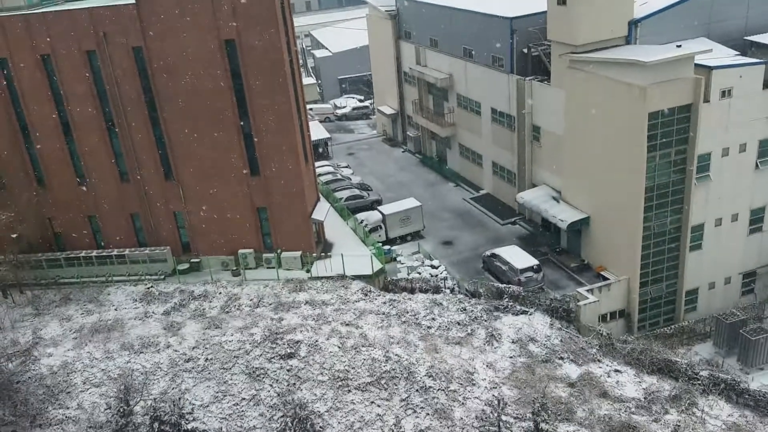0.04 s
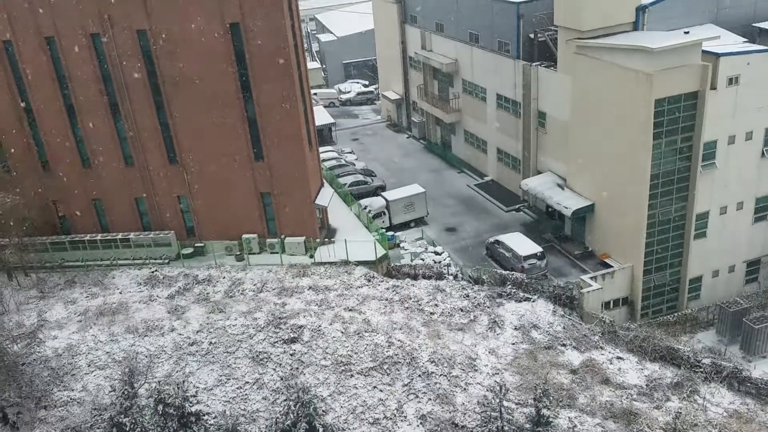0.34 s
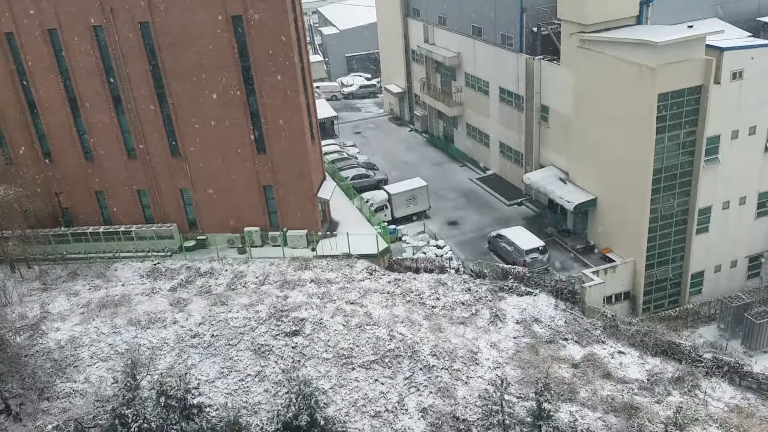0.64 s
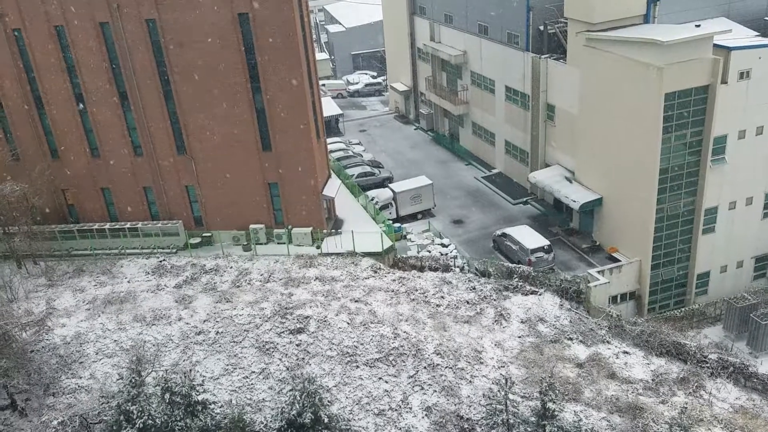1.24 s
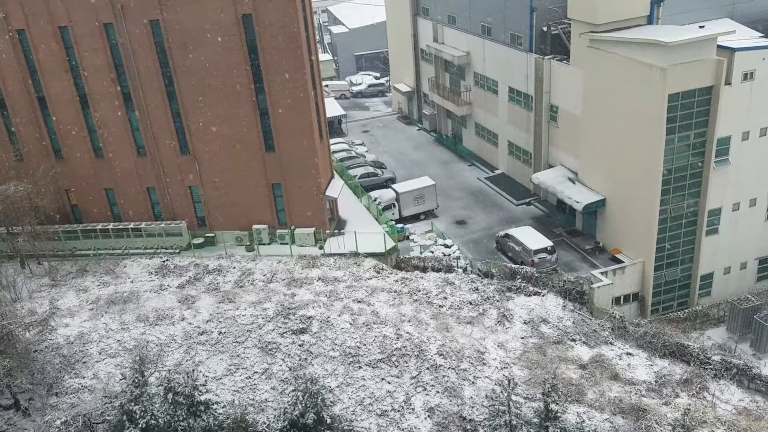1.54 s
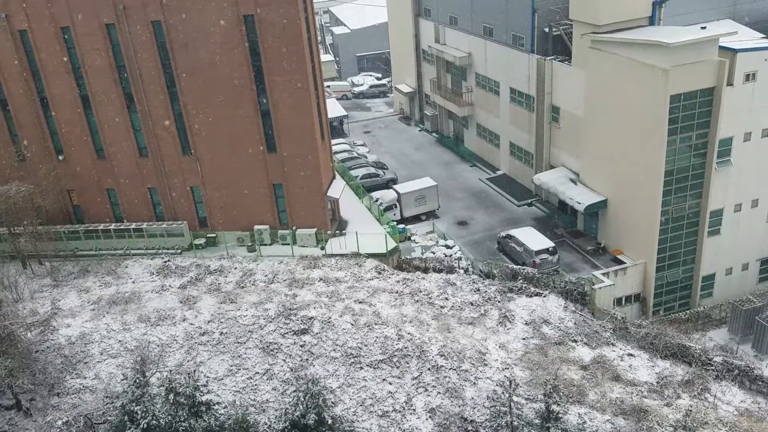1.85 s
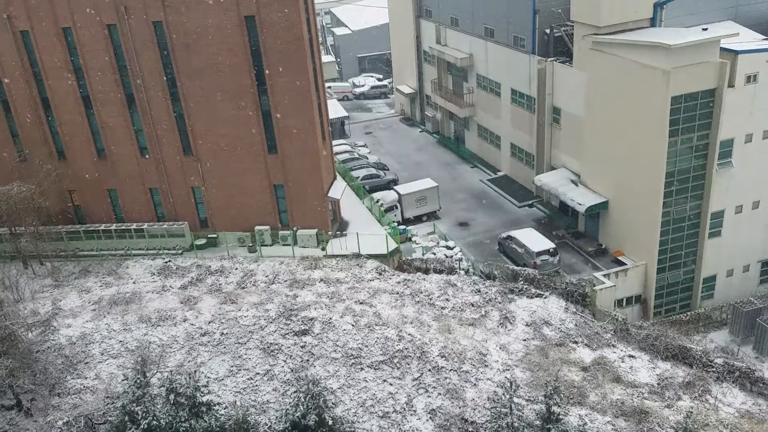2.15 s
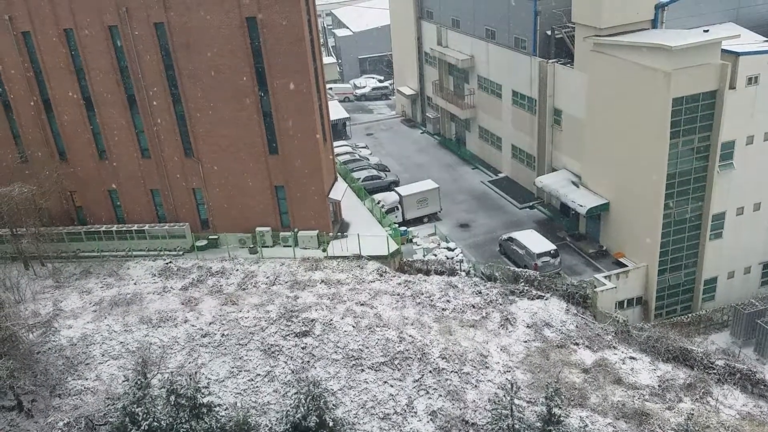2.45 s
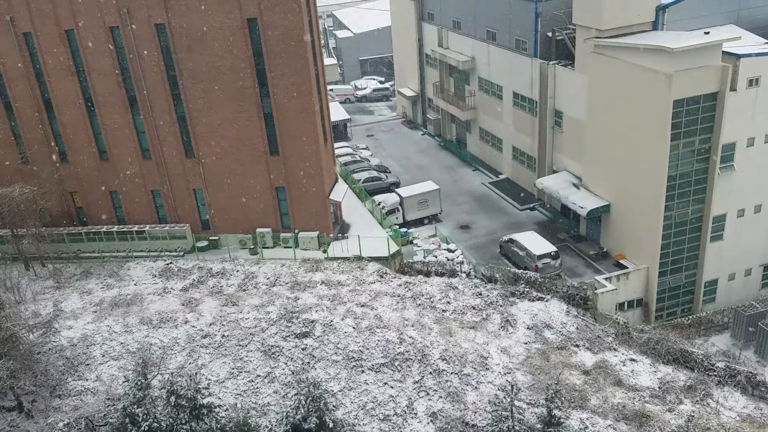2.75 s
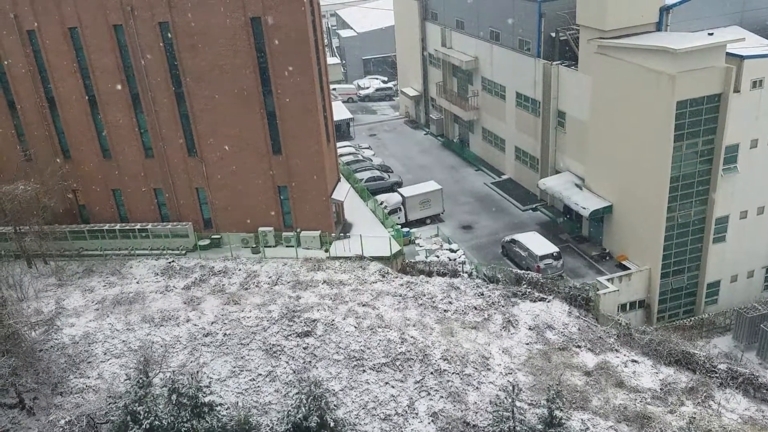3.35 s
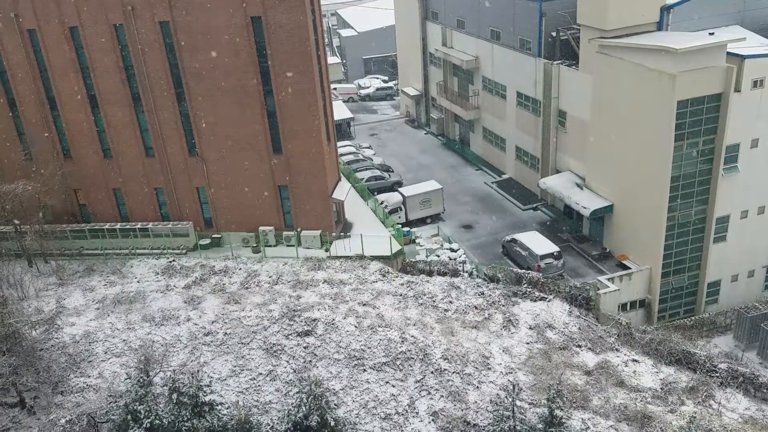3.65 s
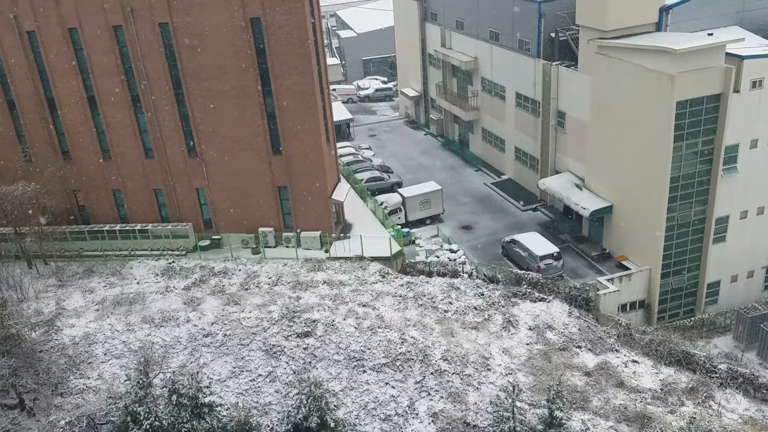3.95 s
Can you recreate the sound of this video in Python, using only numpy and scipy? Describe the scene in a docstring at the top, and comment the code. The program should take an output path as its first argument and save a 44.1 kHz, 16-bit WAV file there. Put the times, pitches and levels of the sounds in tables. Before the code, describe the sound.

A soft, even wash of far traffic carries between town buildings, with faint ventilation whines. Later a low rumble rises along with a pulsing fan hum, while a hand faintly ticks and rubs on the microphone.

```python
"""Far traffic, a steady hush echoed by the walls, heard from high up between the buildings of a snowy town.
Ventilation machinery adds faint whines and a hum that throbs as two fans beat against each other.
Past the middle a low rumble and the hum swell together. Close to the microphone a hand ticks and
rubs faintly on the casing, over the microphone's own hiss."""
import sys
import numpy as np
from scipy import signal
from scipy.fft import rfft, irfft
from scipy.io import wavfile
from scipy.ndimage import uniform_filter1d

SR = 44100
rng = np.random.default_rng(int(sys.argv[2]) if len(sys.argv) > 2 else 0)


def file_out(sig):
    """Save sig as 16-bit WAV at sys.argv[1]."""
    # one column per channel
    cols = np.atleast_2d(sig).T
    # limit, then scale
    lim = np.clip(cols, -1, 1)
    pcm = np.round(lim * 32767).astype(np.int16)
    wavfile.write(sys.argv[1], SR, pcm)


N = 176400

# spectrum of the hush common to both ears: f/Hz, relative density/dB
HUSH_MID_SPECTRUM = [(13, -61), (22, -29), (45, -13.5), (70, -8.5), (97, -9.5), (130, -7.5), (160, -7),
                     (190, -9), (215, -8), (285, -10), (308, -13.5), (342, -7.5), (385, -9.5), (422, -7),
                     (465, -14), (520, -12), (710, -15.5), (825, -19.5), (1150, -16.5), (1430, -26),
                     (1940, -22), (2430, -26.5), (2800, -29.5), (3210, -34), (4400, -38.5), (6000, -46),
                     (9000, -54.5), (11700, -84), (19800, -120)]
# spectrum of the hush that differs between the ears: f/Hz, relative density/dB
HUSH_SIDE_SPECTRUM = [(24, -47), (40, -16), (66, -17.5), (101, -18), (139, -12), (183, -37), (200, -3),
                      (219, -2), (251, -23), (287, 0), (337, -5), (404, -0.5), (621, -5), (815, -2.5),
                      (912, -4), (1310, -7), (1570, -11), (2960, -18), (9000, -42), (11700, -70),
                      (19800, -120)]
# balance of the hush: f/Hz, left minus right/dB
HUSH_BALANCE = [(60, -2), (250, 1.5), (480, -3), (750, 1), (1300, -2), (2000, -2), (3200, -5), (5500, -5.5),
                (8000, 3)]
# slow drift of the traffic: t/s, gain/dB
TRAFFIC_DRIFT = [(0, 0.7), (.8, 0.44), (1.5, -0.2), (2.3, 0), (3.2, 1.5), (4, 0.1)]
# drift of its treble: t/s, gain/dB
TREBLE_DRIFT = [(0, 0.5), (1.5, 0.64), (2.6, -0.6), (3.1, -1.3), (3.5, 0.8), (4, 1.9)]
# spectrum of the rumble: f/Hz, relative density/dB
RUMBLE_SPECTRUM = [(15, -18), (28, -19), (45, -6.5), (85, -0.5), (125, -1.5), (165, 0), (215, -5.5),
                   (290, -11.5), (420, -23.5), (800, -31.5), (2000, -80)]
# swell of the rumble: t/s, gain/dB
RUMBLE_SWELL = [(0, -35), (2.1, -19), (2.35, -13), (2.5, -7), (2.76, -4), (2.92, -1.5), (3.4, -0.5),
                (3.62, 0), (4, -1)]
# envelope of the fan hum: t/s, level/dB
HUM_ENVELOPE = [(0, -50), (2.25, -48.5), (2.55, -42.5), (2.88, -36.5), (3.22, -37), (3.46, -41),
                (3.59, -34), (3.8, -40), (4, -39.5)]
# machine whines: f/Hz, level/dB, left minus right/dB, wander/Hz
WHINE_TONES = [(343, -61, 3, 5), (362, -60, 4, 2), (1627, -76, -2, 4), (1786, -77, -2, 4),
               (1902, -73, -2, 3), (2266, -76, -3, 4), (2440, -76, -3, 3), (2536, -79, -3, 3),
               (2710, -79, -4, 3), (2820, -79, -4, 3), (5891, -88, -8, 2.5)]
# handling ticks: t/s, level/dB, centre f/Hz
HANDLING_TICKS = [(0.29, -50.5, 12200), (.307, -65, 12000), (.783, -61, 4500), (1.341, -57.5, 4200),
                  (1.706, -67, 9000), (1.862, -65.5, 6500), (2.353, -61, 7700), (2.598, -65, 5500),
                  (2.6735, -56.5, 10800), (2.678, -59, 8400), (3.351, -64, 7000), (3.813, -64, 6000)]
# spectrum of the microphone hiss: f/Hz, relative density/dB
HISS_SPECTRUM = [(3000, -13), (7000, -2), (9500, -6), (10800, -3), (11450, -1), (12200, -1.5), (13300, -1),
                 (15500, 1.5)]

TIMES, FREQS = np.arange(N) / SR, np.arange(N // 2 + 1) * SR / N


def traffic(air_hz=7500, treble_hz=1400, flicker_db=.5):
    """Far traffic and fan rush are broadband noise; the air absorbs the treble and stirs the level."""
    absorption = 1 / np.sqrt(1 + (FREQS / air_hz) ** 10)
    mid, side = (noise(colour(rows) * walls() * absorption) * undb(db + flicker_db * walk(rate=5.7))
                 for rows, db in ((HUSH_MID_SPECTRUM, -44.5), (HUSH_SIDE_SPECTRUM, -47.5)))
    lean = np.sqrt(colour(HUSH_BALANCE))
    hush = irfft(rfft(spread(mid, side)) * np.array([lean, 1 / lean]), N)
    treble = signal.sosfiltfilt(signal.butter(2, treble_hz, "high", fs=SR, output="sos"), hush)
    return (hush + treble * (undb(curve(TREBLE_DRIFT)) - 1)) * undb(curve(TRAFFIC_DRIFT))


def walls(count=14, shortest_s=.008, longest_s=.07, echo_db=-19):
    """Comb filtering: delayed reflections from house fronts interfere with the direct sound."""
    delays = rng.uniform(shortest_s, longest_s, count)
    echoes = sum(np.exp(-2j * np.pi * FREQS * delay) for delay in delays)
    return 1 + undb(echo_db) * echoes * FREQS / (FREQS + 500)  # echoes are weaker in the bass


def rumble(peak_db=-36, side_db=-20):
    """Swelling low noise, highly coherent: both ears receive nearly the same wave."""
    band = colour(RUMBLE_SPECTRUM)
    both = spread(noise(band), undb(side_db) * noise(band))
    return pan(both, db=0.5) * undb(peak_db + curve(RUMBLE_SWELL))


def machinery(fan_hz=156.7, weaker_fan_hz=164.0):
    """Two fan tones beat at their difference frequency; thin whines waver on the way."""
    envelope = undb(curve(HUM_ENVELOPE) + .6 * walk(rate=13))
    fan = tone(fan_hz, wander_hz=.2, rate=4.95)
    weaker_fan = undb(-14) * tone(weaker_fan_hz, wander_hz=.2, rate=2.1)
    out = pan((fan + weaker_fan) * envelope, db=-1.5)
    for hz, db, lean_db, wander_hz in WHINE_TONES:
        whine = tone(hz, wander_hz, rate=25) * undb(db + 2 * walk(rate=14))
        out += pan(whine, lean_db)
    return out


def ticks(attack_s=.00036, decay_s=.0042, tail_s=.02, case_hz=3930, case_decay_s=.026):
    """Impacts of a hand: each gives a bright crack and excites the casing's duller, damped resonance."""
    case = stereo_noise(resonance(case_hz, octaves=.33))
    out = np.zeros((2, N))
    for start, db, centre_hz in HANDLING_TICKS:
        age = np.maximum(TIMES - start, 0)
        rise = 1 - np.exp(-age / attack_s)
        fade = np.exp(-age / decay_s) + undb(-9) * np.exp(-age / tail_s)
        crack = fade * stereo_noise(resonance(centre_hz, octaves=.47))
        ring = undb(-4) * np.exp(-age / case_decay_s) * case
        out += undb(db) * rise * (crack + ring)
    return out


def rustle(centre_hz=4330, level_db=-78, swing_db=5):
    """Friction of the hand that holds the microphone makes a faint, uneven band of noise."""
    rubbing = stereo_noise(resonance(centre_hz, octaves=.37))
    return rubbing * undb(level_db + swing_db * walk(rate=29))


def hiss(level_db=-67):
    """Self-noise arises in each microphone separately, so the channels are uncorrelated."""
    return pan(stereo_noise(colour(HISS_SPECTRUM)), db=0.8) * undb(level_db)


def undb(db):
    """Decibels to amplitude ratio."""
    return 10 ** (np.asarray(db) / 20)


def unit(x):
    """Normalisation to rms 1."""
    return x / np.sqrt(np.mean(x ** 2))


def curve(rows):
    """Linear interpolation of (t/s, value) rows."""
    return np.interp(TIMES, *np.array(rows).T)


def colour(rows):
    """Magnitude response from (f/Hz, level/dB) rows."""
    hz, db = np.array(rows).T
    return undb(np.interp(np.log(FREQS + 1), np.log(hz), db))


def resonance(centre_hz, octaves):
    """Magnitude response of a broad resonance, halved at `octaves` from its centre."""
    return 1 / (1 + (np.log2((FREQS + 1) / centre_hz) / octaves) ** 2)


def noise(gain):
    """Spectrally shaped white noise of rms 1."""
    return unit(irfft(rfft(rng.standard_normal(N)) * gain, N))


def stereo_noise(gain):
    """Incoherent noise: one spectrum, drawn anew for each ear."""
    return np.array([noise(gain), noise(gain)])


def walk(rate):
    """Random modulation of rms 1: `rate` steps a second, smoothed twice."""
    hold = int(SR / rate)
    steps = rng.standard_normal(N // 100)[np.arange(N) // hold]
    return unit(uniform_filter1d(uniform_filter1d(steps, hold), hold))


def tone(hz, wander_hz, rate):
    """A sine of rms 1 under random frequency modulation."""
    return np.sqrt(2) * np.sin(2 * np.pi * np.cumsum(hz + wander_hz * walk(rate)) / SR)


def pan(x, db):
    """Placement by interaural level difference, left minus right."""
    return x * undb(np.array([[db], [-db]]) / 2)


def spread(mid, side):
    """Left and right as sum and difference."""
    return np.array([mid + side, mid - side])


def scene():
    """Superposition of town, machinery and the small sounds at the microphone."""
    return traffic() + rumble() + machinery() + ticks() + rustle() + hiss()


def record(dry, bottom_hz=18, top_hz=15750):
    """Band limiting removes the deepest bass and the highest treble."""
    dry = signal.sosfilt(signal.butter(2, bottom_hz, "high", fs=SR, output="sos"), dry)
    return signal.sosfilt(signal.ellip(10, .2, 70, top_hz, fs=SR, output="sos"), dry)


dry = scene()
out = record(dry)
file_out(out)
```